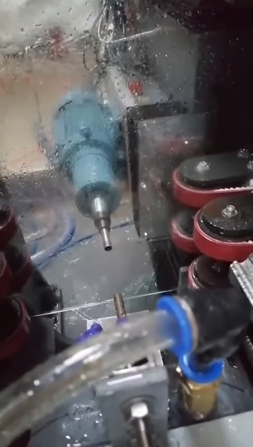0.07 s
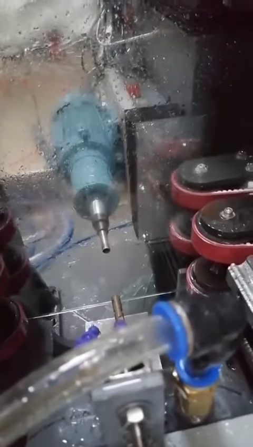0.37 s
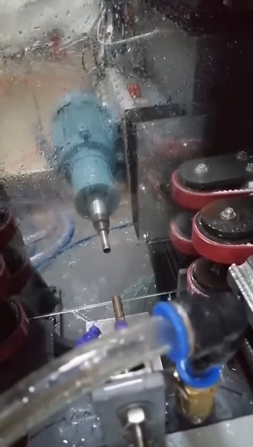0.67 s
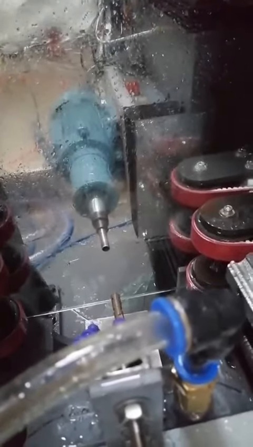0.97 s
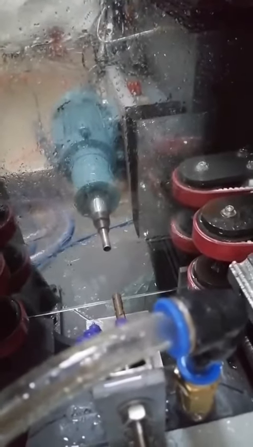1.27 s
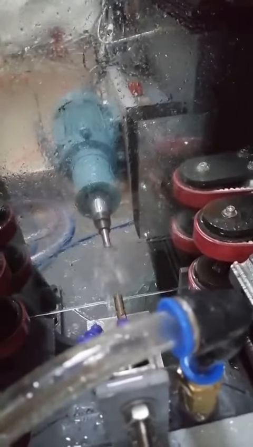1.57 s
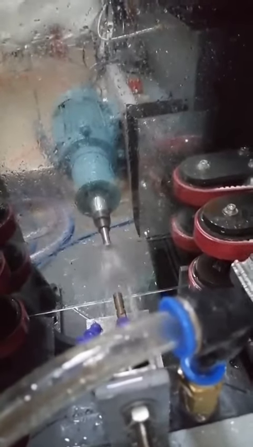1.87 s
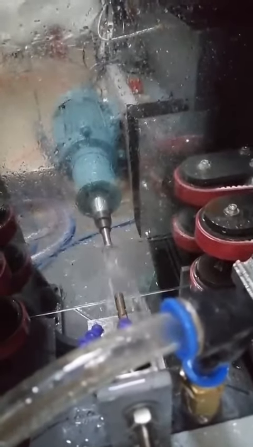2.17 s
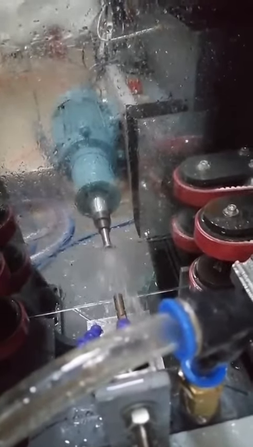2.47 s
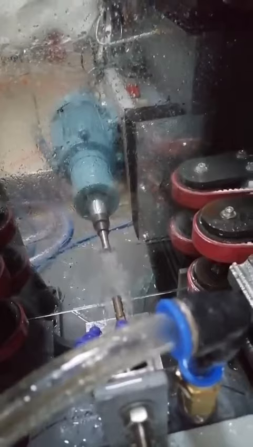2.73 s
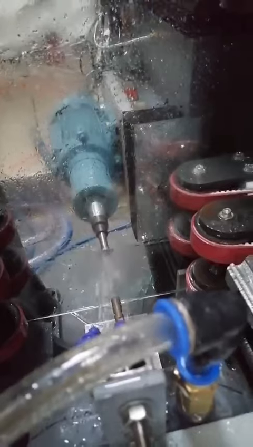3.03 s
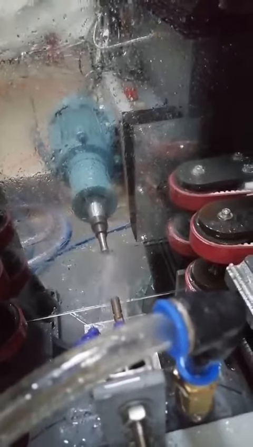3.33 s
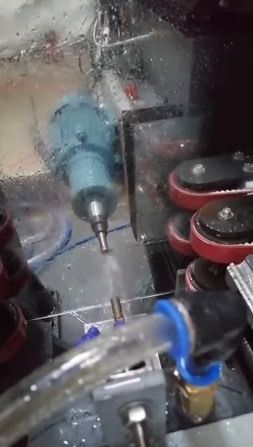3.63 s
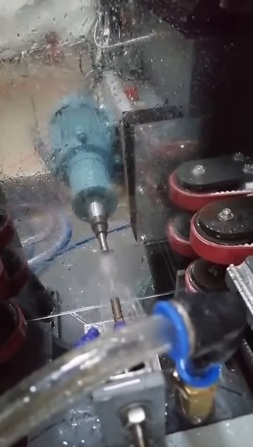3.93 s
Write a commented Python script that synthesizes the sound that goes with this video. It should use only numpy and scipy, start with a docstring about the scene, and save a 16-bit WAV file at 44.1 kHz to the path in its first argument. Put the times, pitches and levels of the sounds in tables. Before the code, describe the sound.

A wet glass drilling machine hisses loudly with whistling compressed air, then cuts off with a valve clunk. After a short puff, quieter water spray spatters in quick pulses over a droning motor and gears, close up in a workshop.

```python
"""Wet glass drilling machine

Heard close up in a workshop, in mono. Compressed air hisses and whistles through a valve until it
shuts with a clunk; a short puff follows. A jet of cooling water then spatters on the drill, surging
five times a second, and the drill bumps the glass. The drive and its gears drone underneath."""
import sys
import numpy as np
from scipy import signal
from scipy.fft import rfft, irfft
from scipy.io import wavfile

SR = 44100
rng = np.random.default_rng(int(sys.argv[2]) if len(sys.argv) > 2 else 0)


def bounce(signal):
    """Save signal as a 16-bit WAV file at the path given by the first command-line argument."""
    frames = np.transpose(np.atleast_2d(signal))
    limited = np.clip(frames, -1, 1)
    pcm = np.round(limited * 32767).astype(np.int16)
    wavfile.write(sys.argv[1], SR, pcm)


N = 176400
T, HZ = np.arange(N) / SR, np.maximum(np.arange(N // 2 + 1) * SR / N, 1)
CUTOFF_HZ, SHAFT_HZ = 12000, 12.357
HUM_WANDER = 0.00156   # relative spread of speed and pitch


def air(shut_s=1.354, decay_db_per_s=418, throb_hz=101):
    """Turbulent flow makes a broadband hiss, joined by whistles, until the valve shuts."""
    # hiss spectrum (frequency [Hz], relative level [dB])
    spectrum = [(900, -31), (1500, -20), (1900, -21.5), (2200, -9), (2700, -7), (3600, -8), (4300, -13.5),
                (4800, -8.5), (5900, -5), (6400, -4), (7400, -7), (8800, -4.5), (9600, -11), (10250, -11),
                (10700, -15.5), (12000, -20)]
    # narrow peaks and dips that colour the hiss (frequency [Hz], width [Hz], gain [dB])
    peaks_and_dips = [(1730, 90, -3), (1925, 90, -11), (2270, 40, 4), (2570, 190, 6), (2750, 80, 2),
                      (2900, 90, -19), (3000, 50, 3), (3085, 70, -9), (3285, 70, 6.5), (3385, 60, -4.5),
                      (3560, 100, 1.5), (3720, 110, -3), (4020, 130, 4.5), (4190, 60, -8), (4410, 70, -6),
                      (4535, 40, -7), (4750, 160, 2), (4940, 90, -2), (5180, 90, 3), (5320, 60, -2),
                      (5520, 130, 3.5), (5780, 150, -4.5), (5920, 50, -5), (6110, 90, -2), (6260, 50, 3),
                      (6560, 130, 5), (6755, 60, -7), (7120, 80, 6), (7260, 40, 4), (7420, 90, -4),
                      (7560, 90, 4), (7730, 120, -15), (8010, 80, 6), (8200, 130, -6), (8560, 190, 5),
                      (8990, 80, 5), (9330, 200, -11), (9820, 80, 5), (10400, 90, -8), (10590, 70, -14),
                      (10920, 60, -7), (11120, 170, 7), (11640, 70, 6)]
    # breathy whistles (frequency [Hz], width [Hz], relative level [dB])
    whistle_bands = [(6610, 30, -52), (8515, 30, -54), (838, 18, -69), (882, 18, -62.5), (934, 18, -63),
                     (985, 18, -68)]
    # two edge tones close enough to beat (frequency [Hz], relative level [dB])
    edge_tones = [(6462, -49.5), (6512, -46)]
    # their common envelope (time [s], gain [dB])
    edge_level = [(0, -6), (.12, 0), (.23, 4), (.36, -2.5), (.55, 9), (.66, -1.5), (.75, 4), (.93, -0.5),
                  (1.03, -6), (1.12, 1.5), (1.2, -1), (1.33, -2)]
    # brief swells of the flow (time [s], gain [dB])
    gusts = [(.055, 1.5), (.23, 0.5), (.31, 1.5), (.388, 1.5), (.512, -0.5), (.553, 0.5), (.612, 0.5),
             (.75, 1.5), (.957, 2.8), (1.118, 2.8)]
    # envelope of the whole flow (time [s], gain [dB])
    air_level = [(0, -1.5), (.2, -0.06), (.58, 0), (.67, -1.3), (.76, 0), (1.06, -0.5), (1.16, 0),
                 (1.33, -0.1)]
    flutter = from_db(-drift(130))
    throb = 1 + 0.045 * np.sin(2 * np.pi * throb_hz * T)   # the motor shakes the flow
    turbulence = patchy(noise(), depth_db=1.5) * flutter * throb
    hiss = from_db(-33) * colour(turbulence, spectrum, peaks_and_dips)
    whistles = sum(from_db(db + 0.7) * noise_band(hz, width) for hz, width, db in whistle_bands)
    tones = level(edge_level) * sum(edge_tone(hz, db) for hz, db in edge_tones)
    gusts_db = sum(db * np.exp(-((T - s) / 0.01) ** 2) for s, db in gusts)
    shut_db = -decay_db_per_s * np.maximum(T - shut_s, 0)
    return (hiss + whistles + tones) * level(air_level) * from_db(gusts_db + shut_db)


def edge_tone(hz, db, wander_hz=4.8, waver_db=1.5):
    """A jet oscillating across an edge gives a near-pure tone, slightly unsteady in pitch and level."""
    phase = 2 * np.pi * (np.cumsum(hz + wander_hz * drift(13)) / SR + rng.random())
    return from_db(db) * rms_one(np.sin(phase) * from_db(waver_db * drift(30)))


def valve():
    """Impacts excite the modes of the valve block; puffs of trapped air resonate in the pipe."""
    # two thuds and a clack (time [s], gain [dB], contact cut-off [Hz])
    clunks = [(1.3442, 2.5, 1400), (1.3502, 2.5, 1100), (1.3522, -4.5, 7000)]
    # modes of the block (frequency [Hz], level [dB], t60 [s])
    block = [(51.6, -47, 0.69), (151, -31, 0.015), (238, -32, 0.037), (297, -32.5, 0.042),
             (526, -39.5, 0.019), (640, -44, 0.047), (755, -38.5, 0.061), (920, -38, 0.18),
             (1112, -43, 0.072), (2080, -33, 0.11), (2550, -27, 0.047), (2600, -31, 0.05),
             (3265, -27, 0.044), (3950, -27, 0.039)]
    # releases of air (time [s], hold [s], level [dB])
    puffs = [(1.349, 0.0049, -38.5), (1.629, 0.0095, -35)]
    # their spectrum (frequency [Hz], relative level [dB])
    spectrum = [(600, -15), (900, -6.5), (1900, -12), (2700, -5.5), (4400, -17), (5200, -6.5), (7000, -6.5),
                (9200, -5.5), (12000, -13.5)]
    # pipe resonances (frequency [Hz], width [Hz], gain [dB])
    pipe = [(1020, 90, 14), (1460, 100, 14), (2750, 160, 11), (4960, 120, 6), (6740, 120, 5),
            (7090, 140, 8), (9140, 120, 6)]
    envelope = sum(from_db(db) * burst(s, 0.0072, hold, 0.017) for s, hold, db in puffs)
    return struck(clunks, block) + envelope * colour(noise(), spectrum, pipe)


def water(ping_db=-12):
    """Drop impacts add up to noise: jet and spray ring the drill, amid splashes and a low wash."""
    # steady jet (frequency [Hz], relative level [dB])
    jet_spectrum = [(900, -11.5), (1300, -27), (1750, -10.5), (2050, -3), (2550, 2), (3000, -0.5),
                    (3700, -3.5), (4200, -7.5), (5200, -2.5), (6300, -0.5), (7700, -2.5), (8600, 3),
                    (9600, -3), (10700, -10), (12000, -16)]
    # its envelope (time [s], level [dB])
    jet_level = [(1.33, -65), (1.39, -45.5), (1.55, -45.5), (1.75, -45.5), (2.3, -45), (3.0, -45.8),
                 (3.6, -46.5), (3.82, -48), (4.0, -50.5)]
    # ringing of the wet drill and holder, plus two dips (frequency [Hz], width [Hz], gain [dB])
    drill = [(2403, 25, 4), (4010, 80, 3), (4450, 200, -4), (4680, 130, 4), (6230, 50, 3), (7095, 70, 6),
             (8010, 70, 5), (8510, 70, 3), (8680, 70, 4), (9000, 100, 3), (10900, 130, -7)]
    # surges of spray (time [s], level [dB])
    surges = [(1.715, -54), (1.896, -44.5), (2.086, -44.5), (2.284, -42.5), (2.49, -43.5), (2.679, -43),
              (2.873, -42.5), (3.07, -41.8), (3.273, -43), (3.464, -42.5), (3.665, -42.5), (3.858, -41.5)]
    # their spectrum (frequency [Hz], relative level [dB])
    spray_spectrum = [(1200, -22), (2000, -13), (2600, -3), (3500, -2.5), (4300, -5), (4800, -1.5),
                      (5800, -1.5), (6500, 2), (7100, 2.5), (7700, -2.5), (8700, 4), (9400, -3),
                      (10300, -2), (10800, -10), (11200, -3), (12000, -13.5)]
    # coarse splashes (time [s], level [dB])
    splashes = [(2.295, -47), (2.70, -47), (2.728, -55), (2.895, -48), (3.089, -44.5), (3.328, -56),
                (3.478, -44.5), (3.697, -47), (3.724, -43), (3.88, -50), (3.94, -43.5)]
    # their spectrum (frequency [Hz], relative level [dB])
    splash_spectrum = [(1500, -16), (2350, 10), (2900, -8), (3500, -12), (4200, 2), (5500, 2.5), (8000, -9),
                       (12000, -18)]
    # water washing over the glass (frequency [Hz], relative level [dB])
    wash_spectrum = [(1050, -0.5), (1300, 0), (1750, 2.5), (2100, -7), (3000, -13), (6000, -35)]
    # its envelope (time [s], level [dB])
    wash_level = [(1.42, -89), (1.55, -61.5), (1.75, -58.5), (3.1, -59.5), (3.7, -60.5), (4.0, -65.5)]
    wash = level(wash_level) * colour(noise(), wash_spectrum)
    jet = colour(spatter(), jet_spectrum, drill)
    jet += from_db(ping_db) * colour(pings(), jet_spectrum, drill)
    spray = colour(spatter(), spray_spectrum, drill)
    spray *= sum(from_db(db) * burst(s, 0.028, 0.05, 0.032) for s, db in surges)
    splash = colour(spatter(), splash_spectrum)
    splash *= sum(from_db(db) * burst(s, 0.0064, 0.0071, 0.0086) for s, db in splashes)
    return wash + level(jet_level) * jet + spray + splash


def spatter(drops_per_s=2500, drop_share=0.22):
    """Shot noise of single drops adds in power to the smooth noise of fine mist."""
    sizes = from_db(-3 * np.minimum(rng.exponential(1, N), 5)) * rng.choice([-1, 1], N)
    drops = rms_one(sizes * (rng.random(N) < drops_per_s / SR))
    mixture = np.sqrt(drop_share) * drops + np.sqrt(1 - drop_share) * noise()
    return patchy(mixture, depth_db=2.5) * from_db(0.2 * drift(40))   # the whole jet sputters


def pings(per_s=110, t60_cycles=50, pitches=18):
    """Big drops land at random, each ringing as a damped oscillator."""
    sizes = from_db(3 * np.minimum(rng.exponential(1, N), 3))
    impacts = sizes * (rng.random(N) < per_s / SR)
    pitch_index, out = rng.integers(0, pitches, N), np.zeros(N)
    for k, hz in enumerate(np.geomspace(2060, 7000, pitches)):
        radius, angle = np.exp(-np.log(1000) * hz / t60_cycles / SR), 2 * np.pi * hz / SR
        feedback = [1, -2 * radius * np.cos(angle), radius ** 2]
        out += signal.lfilter([1, 0, -1], feedback, impacts * (pitch_index == k) + 1e-18)
    return rms_one(out)


def glass():
    """Dull bumps of the drill excite the low modes of the glass sheet on its rests."""
    # contacts (time [s], gain [dB], contact cut-off [Hz])
    bumps = [(1.8865, 0, 600), (1.893, -4.5, 600), (1.916, -14, 400)]
    # modes of the sheet (frequency [Hz], level [dB], t60 [s])
    sheet = [(101, -46, .12), (150, -39, .06), (190, -38, .06), (440, -35.5, 0.07)]
    return struck(bumps, sheet)


def drone(cyclic_share=0.25):
    """Rotation gives shaft harmonics and a rumble that partly repeats each turn; the frame hums too."""
    # tones of the drive (multiple of the shaft rate [1], relative level [dB])
    orders = [(4, -78), (12, -55.5), (13, -63.5), (28, -61), (32, -62.5), (36, -60), (38, -64.5),
              (40, -65.5), (43, -72), (56, -67.5), (72, -65), (76, -64), (80, -66.5), (84, -66), (100, -69),
              (108, -69.5)]
    # hums of the frame (frequency [Hz], relative level [dB])
    frame = [(59, -67), (219, -63.5)]
    # rumble spectrum (frequency [Hz], relative level [dB])
    spectrum = [(25, -7), (50, 5.5), (70, -1), (110, 4), (170, 5), (260, 4.5), (380, 4), (490, 4.5),
                (590, -4), (780, -15), (950, -3.5), (1150, -7), (1500, -29.5), (2500, -23.5)]
    # envelope of the drone (time [s], gain [dB])
    drone_level = [(0, -11), (1.33, -10), (1.42, -4.5), (1.58, -1.5), (1.9, .5), (2.4, -1.5), (3.1, 0),
                   (3.7, -1.5), (4.0, -4)]
    turns = SHAFT_HZ * np.cumsum(1 + HUM_WANDER * drift(4.05)) / SR
    one_turn = rng.standard_normal(int(SR / SHAFT_HZ))
    cyclic = one_turn[(turns % 1 * len(one_turn)).astype(int)]
    vibration = np.sqrt(cyclic_share) * cyclic + np.sqrt(1 - cyclic_share) * noise()
    rumble = from_db(-50) * colour(vibration, spectrum)
    tones = [(k * SHAFT_HZ, db) for k, db in orders] + list(frame)
    return level(drone_level) * (sum(hum(hz, db) for hz, db in tones) + rumble)


def gear(teeth=27):
    """Periodic tooth contact sounds at the mesh frequency, teeth times shaft rate, and its octave."""
    # envelopes of the two tones (time [s], mesh level [dB], octave level [dB])
    mesh = [(1.33, -80, -82), (1.42, -64, -62), (1.6, -59.5, -59.5), (2.15, -63.5, -58), (2.55, -56, -57),
            (3.0, -55.5, -62.5), (3.45, -61, -63.5), (4.0, -66, -69)]
    times, *levels_db = np.transpose(mesh)
    return sum(hum(k * teeth * SHAFT_HZ, np.interp(T, times, db)) for k, db in enumerate(levels_db, 1))


def workshop():
    """The ambient noise of the room is broadband, strongest near 950 Hz."""
    # ambient spectrum (frequency [Hz], relative level [dB])
    spectrum = [(30, -21), (150, -22), (500, 0.5), (950, 8.5), (1300, -8), (2000, -29), (8000, -4.5)]
    # its envelope (time [s], level [dB])
    room_level = [(0, -58), (1.33, -53.5), (1.43, -63), (1.65, -55.5), (2.7, -54.5), (3.6, -55.5),
                  (4.0, -62.5)]
    return level(room_level) * colour(noise(), spectrum)


def struck(blows, modes):
    """Each blow rings a sum of damped modes; a soft contact barely excites the high ones."""
    out = np.zeros(N)
    for s, blow_db, contact_hz in blows:
        age = np.maximum(T - s, 0)
        for k, (hz, db, t60) in enumerate(modes):
            strength = from_db(blow_db + db + rng.normal()) / (1 + (hz / contact_hz) ** 2)
            out += (-1) ** k * strength * np.exp(-np.log(1000) * age / t60) * np.sin(2 * np.pi * hz * age)
    return out


def hum(hz, db, waver_db=2):
    """A tone under slow random frequency and amplitude modulation."""
    phase = 2 * np.pi * (hz * np.cumsum(1 + HUM_WANDER * drift(5.15)) / SR + rng.random())
    return from_db(db) * rms_one(np.sin(phase) * from_db(waver_db * drift(5.8)))


def colour(x, spectrum, bells=()):
    """Filter by a broad spectral envelope with narrow peaks or dips; rms 1."""
    hz, db = np.transpose(spectrum)
    shape = np.interp(np.log(HZ), np.log(hz), db)
    for centre, width, height in bells:
        shape += height * 2 ** -(2 * (HZ - centre) / width) ** 2
    low_cut = 1 / np.sqrt(1 + (.8 * hz[0] / HZ) ** 8)
    return rms_one(irfft(rfft(x) * from_db(shape) * low_cut, N))


def patchy(x, depth_db, rate_hz=20, count=16):
    """Independent amplitude modulation makes each band flicker."""
    place, spectrum = np.interp(np.log(HZ), np.log([1000, CUTOFF_HZ]), [0, count - 1]), rfft(x)
    bands = (irfft(spectrum * np.maximum(1 - abs(place - k), 0), N) for k in range(count))
    return sum(band * from_db(depth_db * drift(rate_hz)) for band in bands)


def burst(start, attack, hold, fall):
    """Linear rise, hold and exponential decay; times in seconds."""
    return np.clip((T - start) / attack, 0, 1) * np.exp(-np.maximum(T - start - attack - hold, 0) / fall)


def noise():
    """White Gaussian noise."""
    return rng.standard_normal(N)


def noise_band(hz, width):
    """Noise through one resonance peak; rms 1."""
    return rms_one(irfft(rfft(noise()) / (1 + ((HZ - hz) / width * 2) ** 2), N))


def drift(rate_hz):
    """Random fluctuation from low-passed noise; rms 1."""
    return noise_band(0, 2 * rate_hz)


def level(rows):
    """Gain envelope through (time [s], level [dB]) points."""
    return from_db(np.interp(T, *np.transpose(rows)))


def from_db(db):
    """Decibels to amplitude ratio."""
    return 10 ** (np.asarray(db) / 20)


def rms_one(x):
    """Scale to unit rms."""
    return x / np.sqrt(np.mean(x ** 2) + 1e-20)


def scene():
    """Superposition of all sources, alike in both channels."""
    mono = air() + valve() + glass() + water() + drone() + gear() + workshop()
    return np.array([mono, mono])


def record(dry):
    """A steep elliptic low-pass removes the top of the treble."""
    return signal.sosfilt(signal.ellip(12, .1, 90, CUTOFF_HZ, fs=SR, output="sos"), dry)


dry = scene()
out = record(dry)
bounce(out)
```